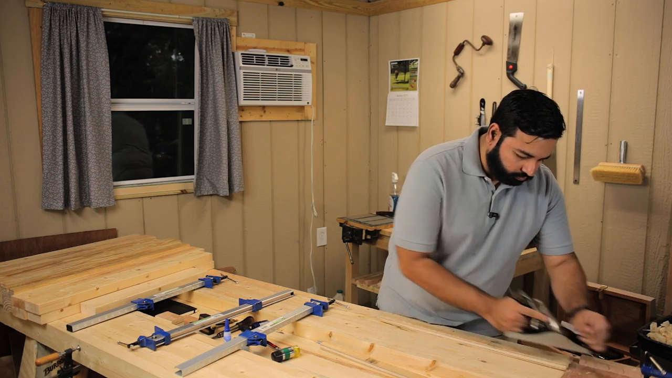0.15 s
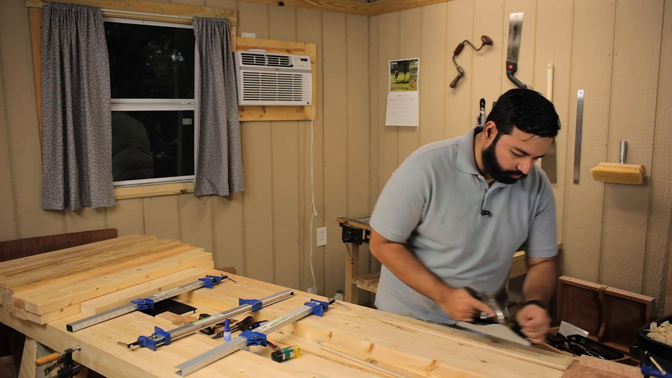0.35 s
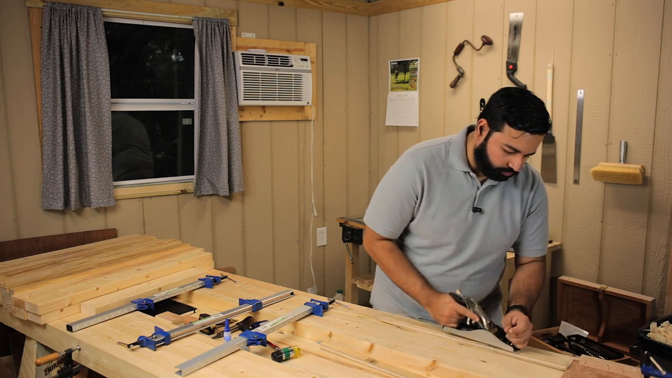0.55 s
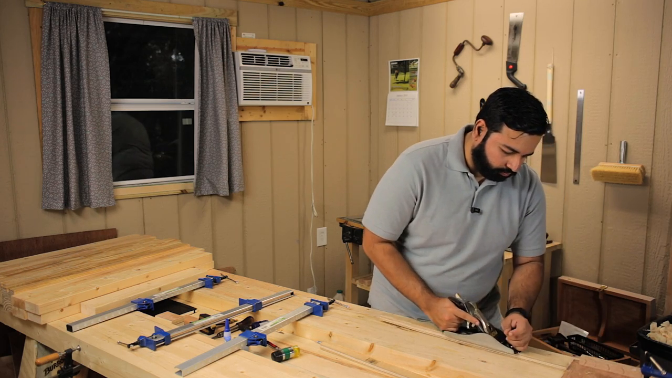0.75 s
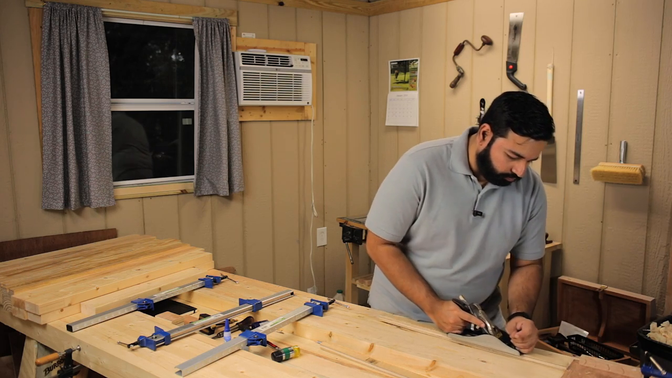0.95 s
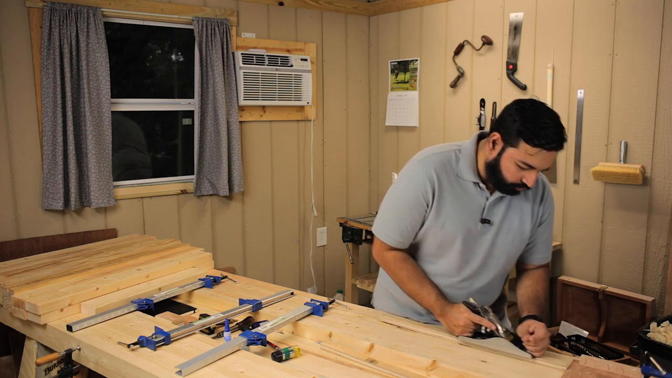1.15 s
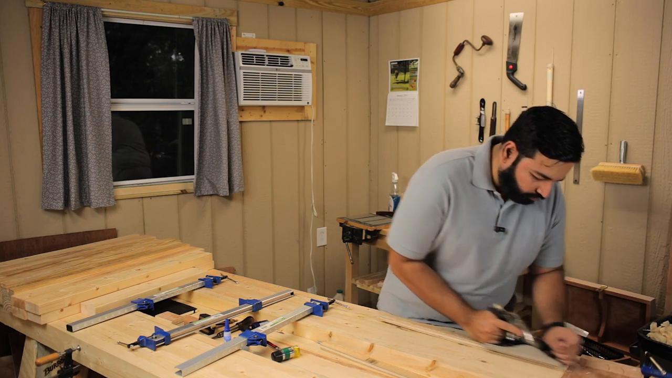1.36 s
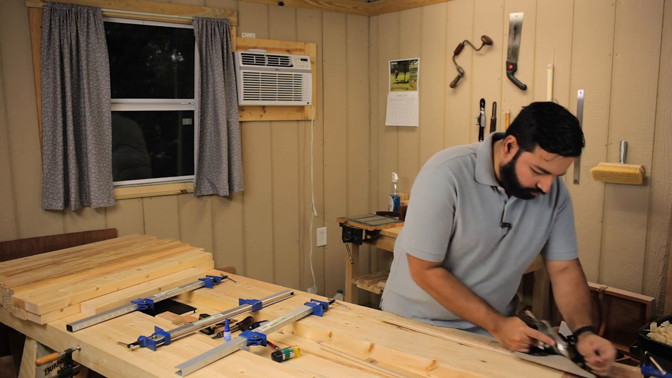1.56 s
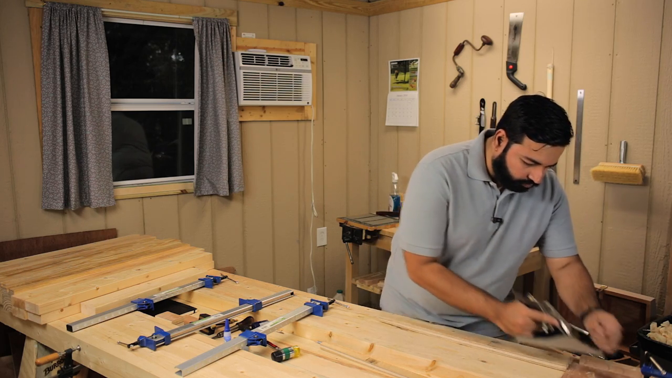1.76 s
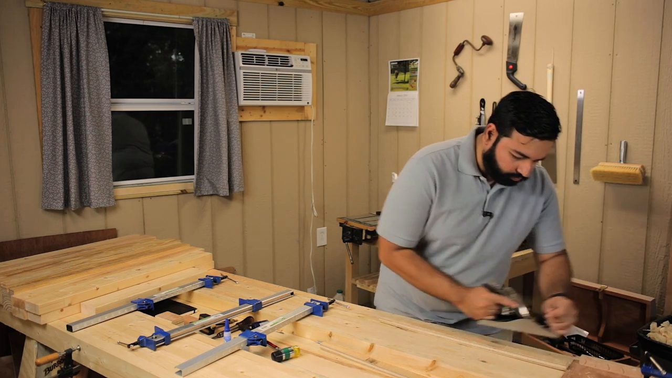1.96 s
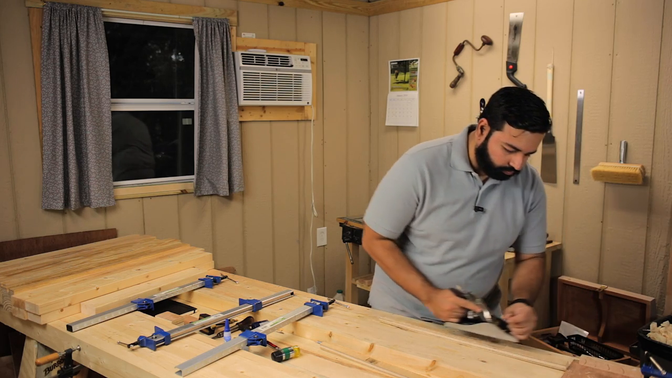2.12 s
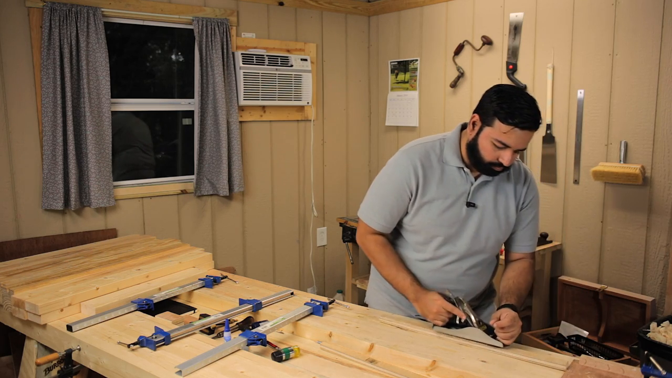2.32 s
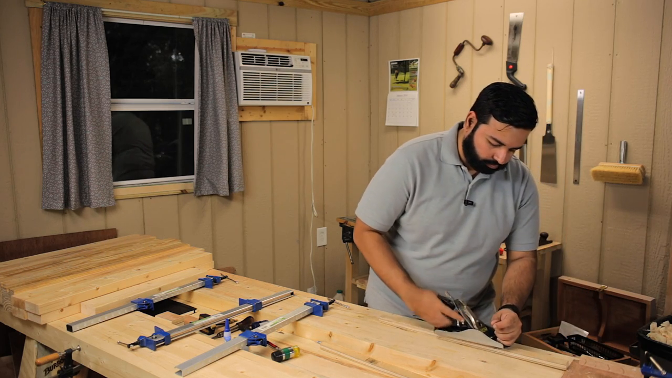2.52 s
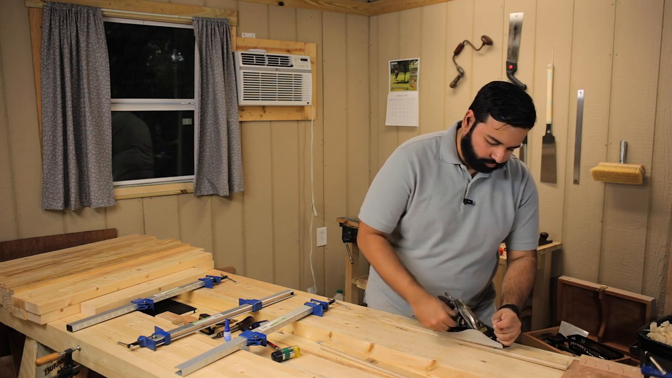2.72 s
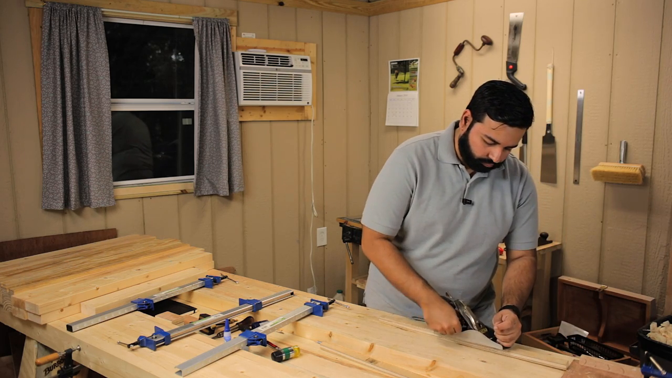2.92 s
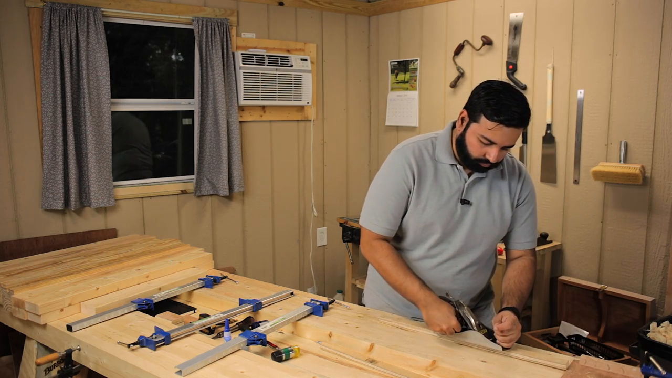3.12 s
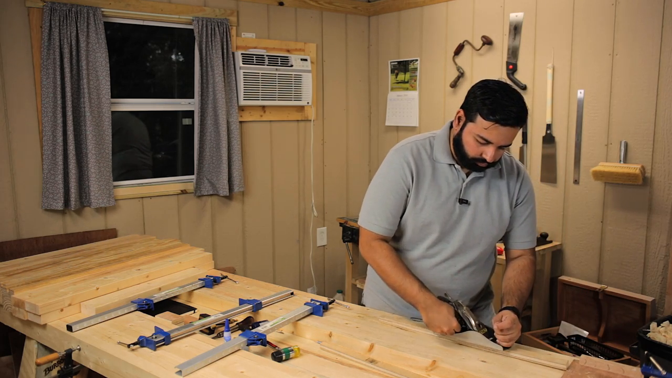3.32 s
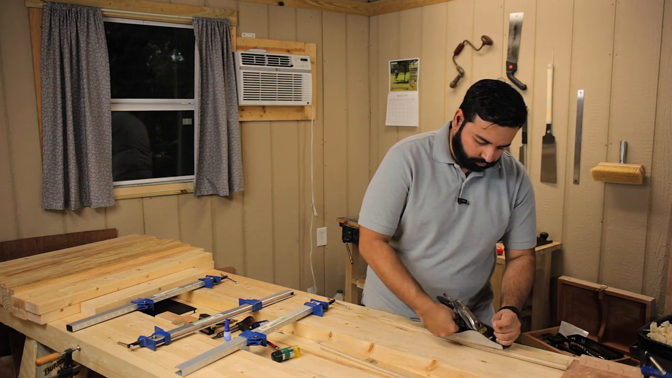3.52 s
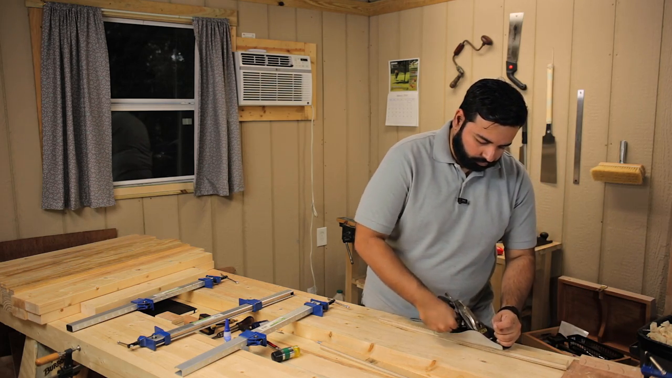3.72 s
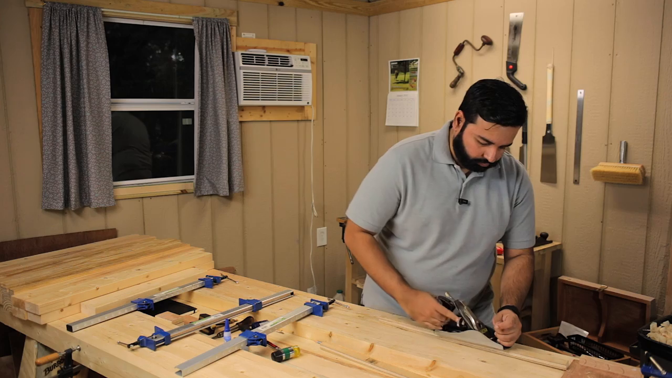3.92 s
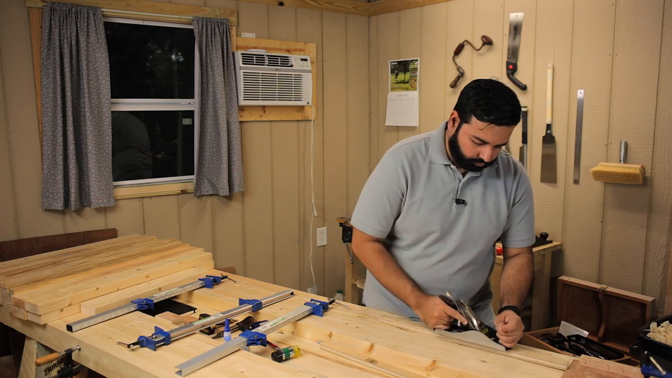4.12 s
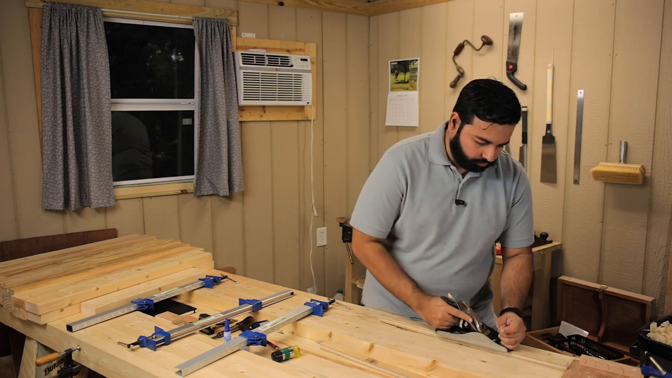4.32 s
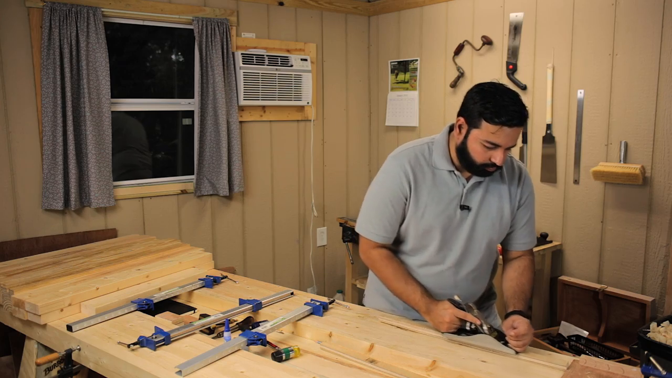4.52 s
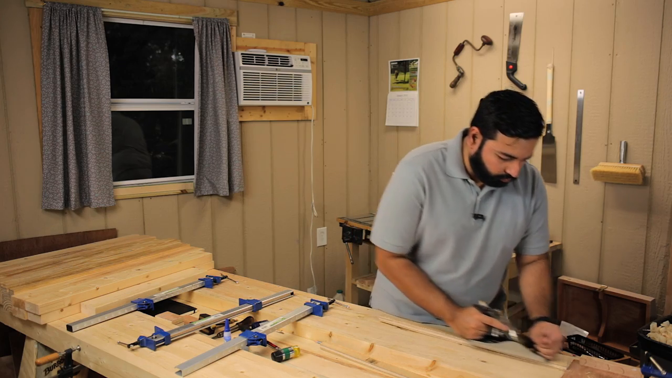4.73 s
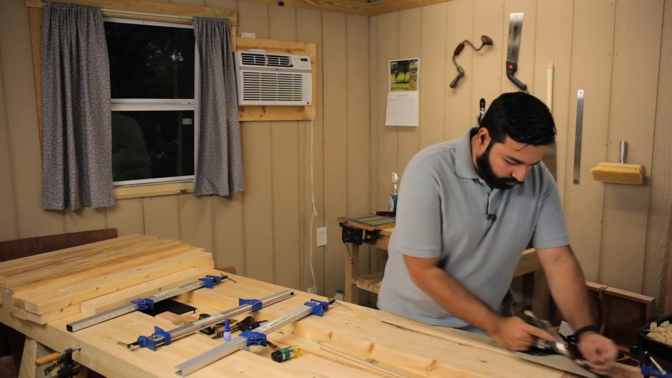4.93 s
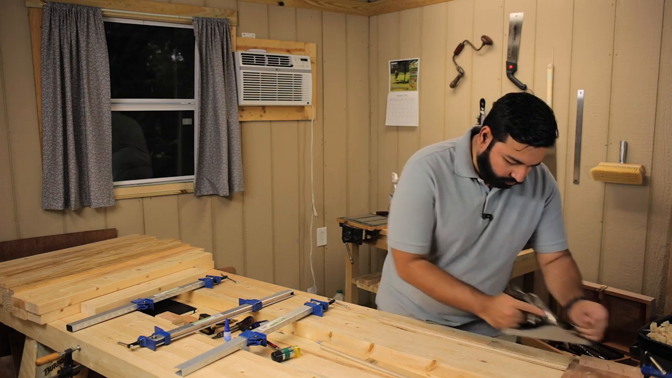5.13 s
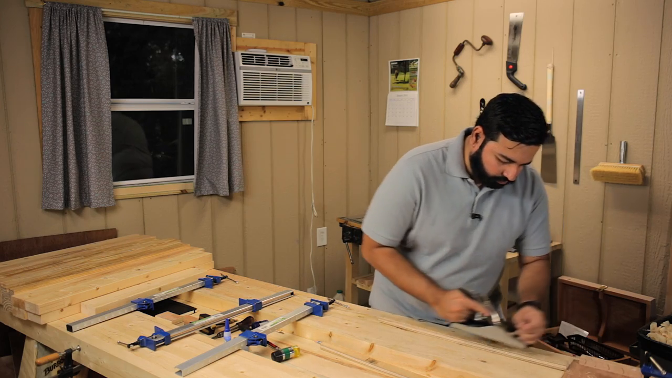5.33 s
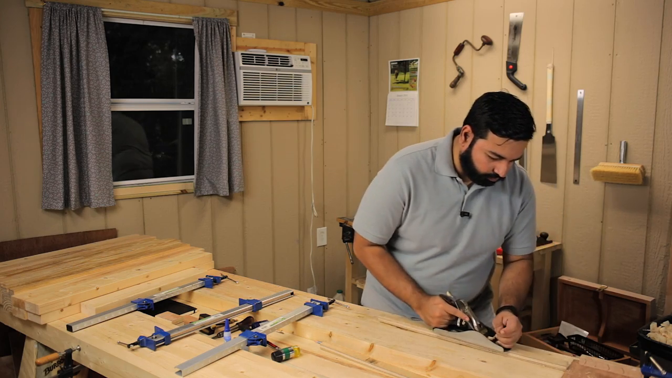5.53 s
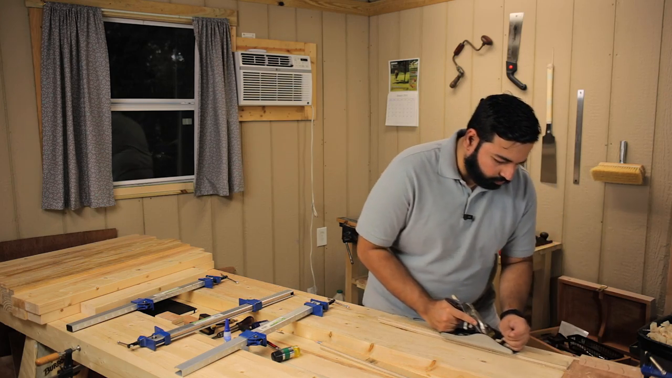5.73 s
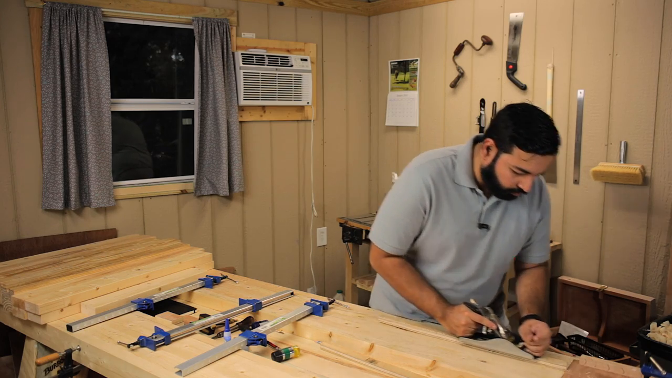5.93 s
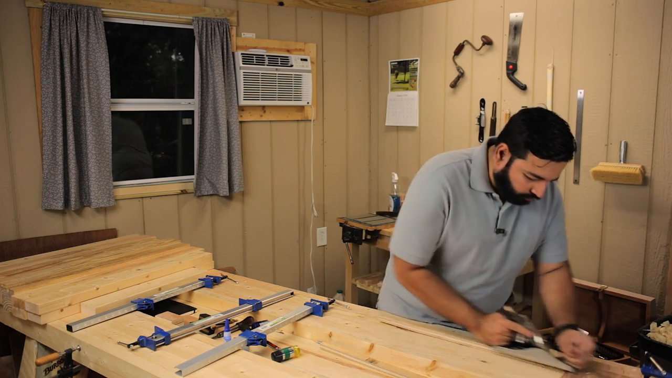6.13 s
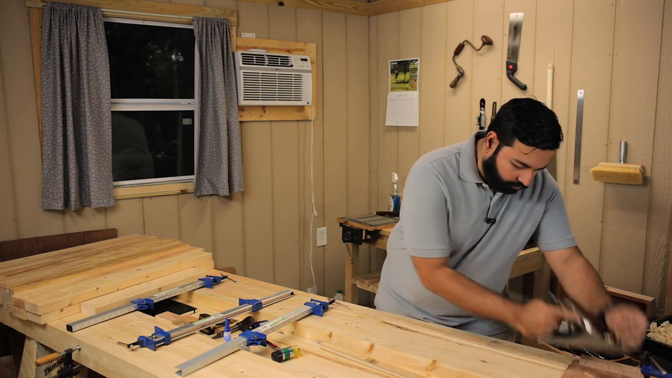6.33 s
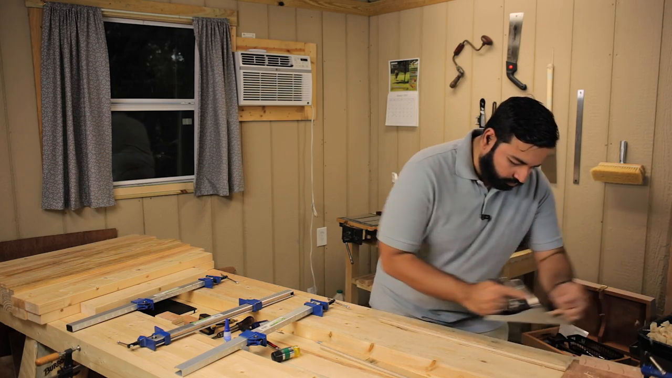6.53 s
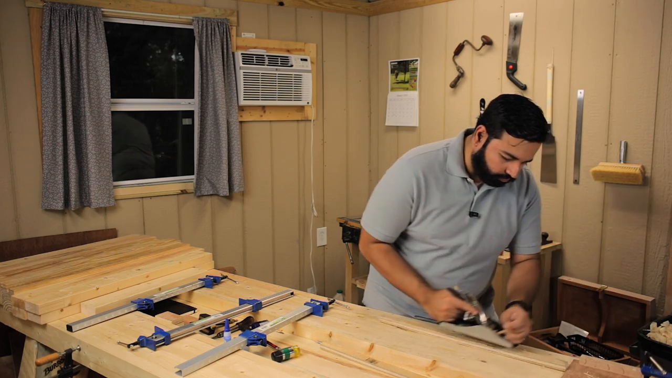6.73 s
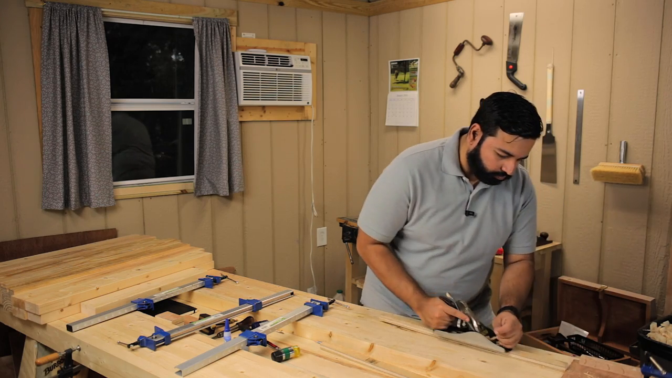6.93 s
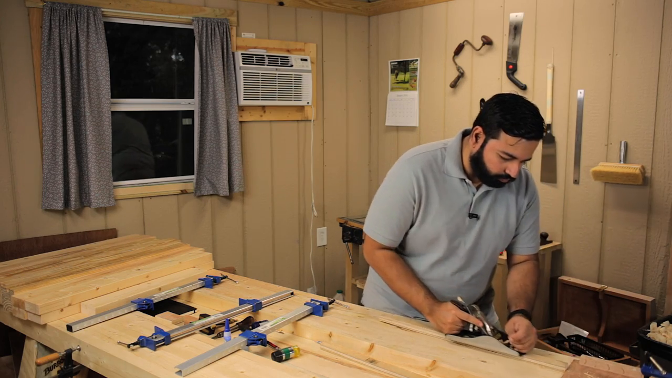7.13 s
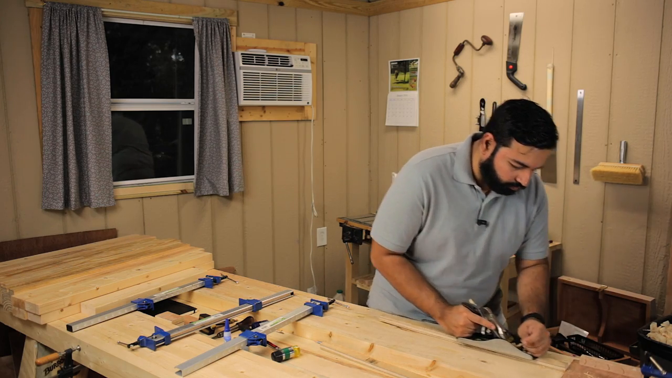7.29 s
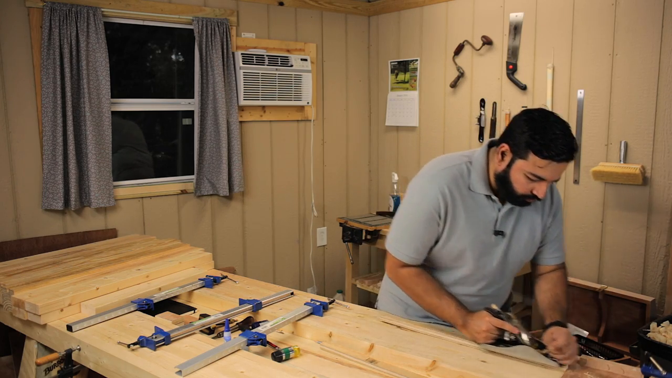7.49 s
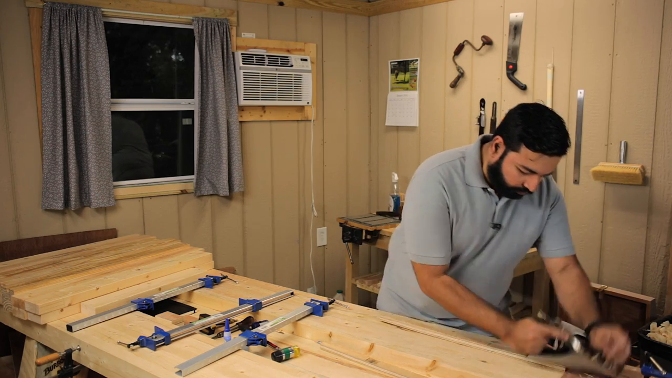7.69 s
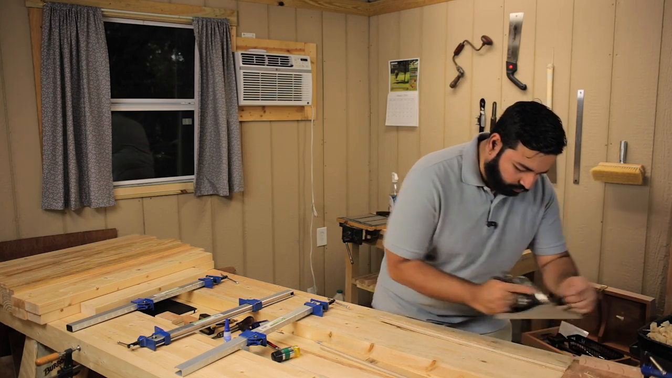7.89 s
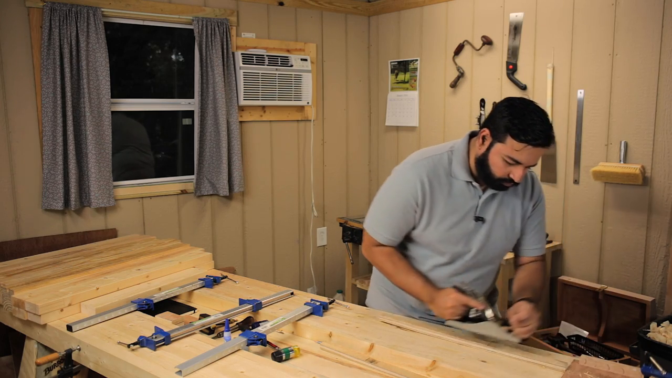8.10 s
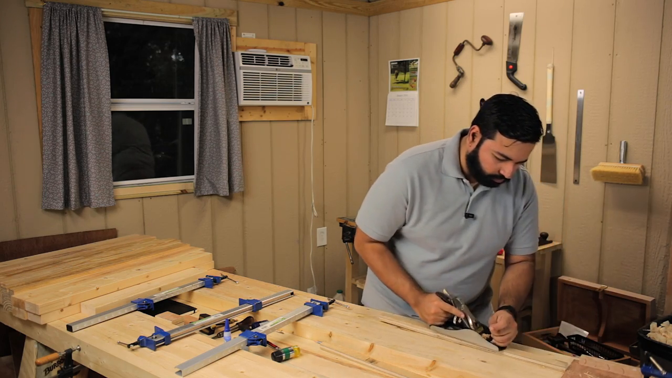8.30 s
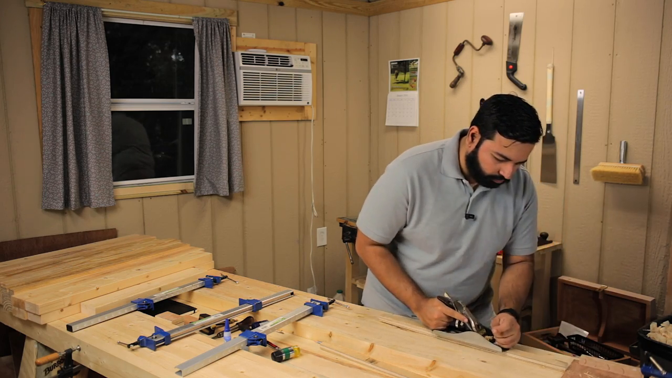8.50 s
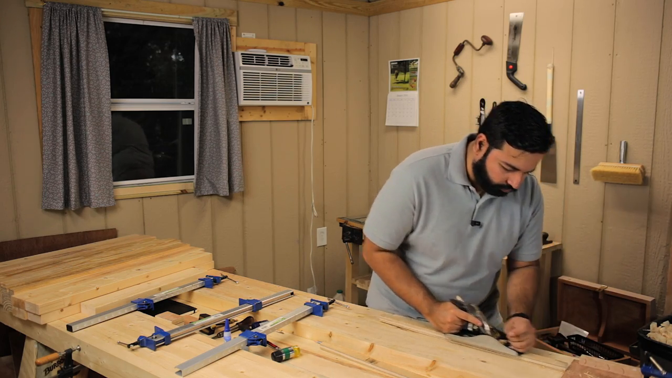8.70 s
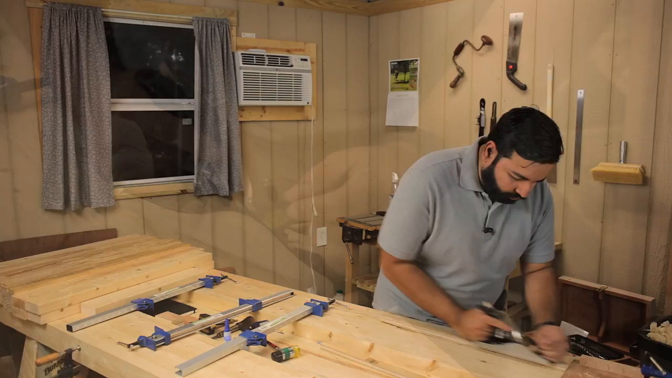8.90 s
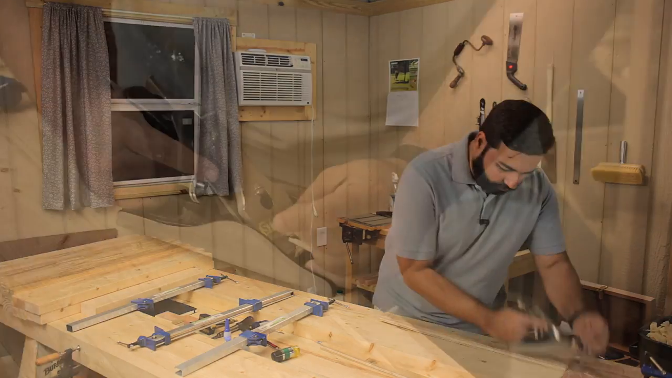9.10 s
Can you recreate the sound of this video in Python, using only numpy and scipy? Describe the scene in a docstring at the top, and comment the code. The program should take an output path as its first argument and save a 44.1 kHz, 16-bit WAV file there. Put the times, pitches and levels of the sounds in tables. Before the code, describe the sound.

In a small wooden workshop, a hand plane rasps once along a plywood strip. Its adjusting wheel scrapes and squeaks faintly, and a metal lever snaps shut. Four more bright, hissing strokes follow, with ticks of tool and chips and a few wooden knocks as the plane lands on the bench. A close stereo microphone picks up soft sleeve swishes, low bumps and quiet room air.

```python
"""In a small wooden shop, a hand plane is set on a plywood strip, slid into place and pushed five times.
Breaking fibres make a random friction force that drives the resonances of iron, sole and board.
Between strokes, impacts of the plane set the bench vibrating; once its depth wheel is turned, scraping
and squeaking, and its cap lever snaps shut. Tool and chips tick, and the room reverberates.
A close stereo microphone also picks up low bumps, soft swishes of sleeves and sole, and quiet room air."""
import sys
import numpy as np
from scipy import signal
from scipy.fft import rfft, irfft, next_fast_len
from scipy.io import wavfile
from scipy.ndimage import uniform_filter1d, map_coordinates

SR = 44100
rng = np.random.default_rng(int(sys.argv[2]) if len(sys.argv) > 2 else 0)


def log_audio(samples):
    """Write samples as a 16-bit WAV file to the path given in sys.argv[1]."""
    # one column per channel
    frames = np.atleast_2d(samples).T
    # limit to full scale, then quantise
    limited = np.clip(frames, -1, 1)
    pcm = np.round(limited * 32767).astype(np.int16)
    wavfile.write(sys.argv[1], SR, pcm)


N = 403515

# Noise spectra. Each row: frequency in Hz, relative spectral density in dB.
AIR_SPECTRUM = [(40, -11), (70, 3.5), (220, 0), (540, -7.5), (1100, -14), (2000, -15.5), (3900, -16),
                (5000, -22), (7500, -25.5), (12000, -23.5), (15000, -34), (16000, -39)]
SWISH_SPECTRUM = [(880, -16), (1500, -6.5), (2100, -8), (4070, 0.5), (4810, -4), (6930, -13.5), (9700, -7),
                  (14000, -11), (15900, -13.5)]
RUMBLE_SPECTRUM = [(8.8, -34.5), (15, 9.5), (26, 3), (42, -7), (100, -19.5), (134, -21.5), (220, -28),
                   (290, -58), (480, -120)]
# Coherence of the room air. Each row: frequency in Hz, left-right correlation.
AIR_CORRELATION = [(60, -0.67), (180, -0.46), (550, -0.28), (1650, 0.32), (4970, 0.43), (15000, -0.22)]
# Swells of noise. Each row: start, crest and end in seconds, level in dB.
SOFT_SWISHES = [(0.0, .18, 0.26, -50), (0.27, .32, 0.35, -59), (1.6, 1.72, 2, -48), (2.03, 2.1, 2.37, -55),
                (4.17, 4.24, 4.26, -57.5), (4.325, 4.345, 4.5, -48), (5.1, 5.2, 5.7, -56.5),
                (5.32, 5.58, 5.64, -51), (6.3, 6.4, 6.7, -49.5), (6.66, 6.82, 7.25, -49.5),
                (8.08, 8.3, 8.71, -52), (4.5, 4.7, 5.5, -50), (5.7, 5.9, 6.9, -48), (8.66, 8.84, 13, -52)]  # sleeves; in the last three rows, the sole hissing into a cut
MIC_SWAYS = [(-.1, 0, .45, -32.5), (.95, 1.1, 1.65, -38), (1.7, 1.8, 2.05, -36), (1.95, 2.13, 2.33, -42.5),
             (3.9, 4.15, 4.24, -42), (4.35, 4.5, 4.62, -38), (4.68, 4.8, 4.7, -30), (5.02, 5.13, 5.35, -35),
             (5.3, 5.6, 5.9, -36.5), (6.3, 6.52, 6.75, -39), (6.7, 6.87, 6.9, -36),
             (7.76, 7.89, 8.05, -22.5), (8.1, 8.28, 8.6, -38), (9.05, 9.15, 9.2, -33)]
# Jolts through the microphone. Each row: start in seconds, relative level in dB.
MIC_JOLTS = [(0.069, -36), (1.089, -33), (5.438, -40), (5.881, -29), (6.413, -13.5), (6.498, -26),
             (6.868, -36), (7.855, -17), (9.132, -20.5)]

# Reverberation time of the shop. Each row: frequency in Hz, T60 in seconds.
ROOM_T60 = [(100, 0.37), (400, 0.42), (1100, 0.49), (2500, 0.59), (5000, 0.45), (12000, 0.29)]
# Balances of the sound field. Each row: frequency in Hz, gain in dB.
REVERB_GAIN = [(100, -2), (400, -1.5), (1100, -8), (3000, -11), (8000, -5), (15000, -10)]
REVERB_SIDE_RE_MID = [(100, -4), (300, -8.5), (1000, -3.5), (3000, -12), (8000, 7), (15000, 4)]
DIRECT_LEFT_RE_RIGHT = [(60, 3), (180, -4), (550, 0.5), (1650, 1.5), (4970, 3), (15000, -3.5)]

# Resonances. Each row: frequency in Hz, bandwidth in Hz, relative level in dB.
IRON_MODES = [(2850, 164, -5), (3093, 108, 2.5), (3430, 164, 1.5), (3635, 88, 3), (3810, 124, -1.5),
              (4140, 185, -1), (4470, 170, -2), (5350, 270, -26.5)]  # cutting iron
FIZZ_MODES = [(5050, 430, 1), (6060, 520, -5.5), (6470, 140, 1.5), (7310, 520, -2), (8680, 300, -1),
              (10040, 210, 1), (10810, 330, 1.5), (11630, 390, 0.5), (13270, 710, -7.5),
              (15500, 1200, -21.5)]  # high modes of iron and cap
SOLE_MODES = [(1586, 770, -6), (2164, 365, 3), (2714, 130, -1)]  # cast sole
CASTING_MODES = [(2980, 39, -13), (3510, 45, 0.5), (4220, 54, -6.5), (4500, 140, -12.5), (5420, 130, -17.5)]  # upper modes of the plane body
SEAT_MODES = [(1880, 130, -12), (2200, 56, -1)]  # lower modes of the blade seat
BOARD_MODES = [(144, 31, -13), (255, 54, -8), (352, 56, -3), (582, 67, -3), (897, 45, -3.5),
               (985, 53, -5.5), (1263, 93, 1.5)]  # strip and bench top, rubbed
EDGE_MODES = [(4050, 297, 7.5), (4360, 340, 1.5), (5290, 730, -10.5), (6100, 600, -13.5)]  # bright ring near the strip's end
FREE_STRIP_MODES = [(320, 54, -6), (613, 215, -6), (982, 86, 5), (1265, 150, 0)]  # strip without load
PINCHED_STRIP_MODES = [(1280, 480, 2.5), (1600, 540, 3.5), (1970, 430, 2)]  # strip under the sole
BENCH_MODES = [(98, 49, -6.5), (156.5, 26, 0), (225, 40, -5), (297, 50, -2.5), (400, 68, -4),
               (586, 154, -5), (739, 110, -5), (971, 87, -8.5), (1225, 72, -4.5), (1580, 310, -11)]  # bench top, struck
# Steel modes of the cap lever. Each row: frequency in Hz, relative level in dB, T60 in seconds.
LEVER_MODES = [(700, -15, .03), (974, -13, .03), (1290, -6, .035), (1920, -1, .03), (2150, -4, .03),
               (2690, -5, .022), (3050, -7, .02), (3520, -5, .03), (4150, -10, .018), (6900, -27, .012)]

# Ticks of tool and chips. Each row: start in seconds, drive level in dB, centre frequency in Hz.
CHIP_TICKS = [(0.2, -32, 3940), (0.3, -38.5, 3030), (0.325, -37, 4240), (0.478, -43, 3300),
              (0.8094, -39.5, 4040), (0.932, -33.5, 3400), (1.142, -24.5, 3460), (1.1505, -16.5, 3420),
              (1.278, -30, 3990), (1.9424, -37, 3830), (3.1373, -39, 3080), (4.3417, -27.5, 4000),
              (4.423, -39.5, 3270), (4.442, -32.5, 4100), (4.468, -29, 3400), (4.7475, -10, 3780),
              (4.775, -16, 3400), (5.75, -32, 2170), (5.9638, -6, 3380), (7.119, -29, 4310),
              (8.5902, -32, 4050), (8.659, -28, 2170), (8.679, -24, 3580), (8.693, -15, 2220),
              (8.72, -43, 2770)]
# Turns of the depth wheel. Each row: start and length in seconds, relative level in dB.
WHEEL_TURNS = [(2.892, 0.028, -54), (2.97, 0.051, -58), (3.08, 0.022, -61), (3.202, 0.062, -48),
               (3.256, 0.037, -45), (3.32, 0.021, -60), (3.377, 0.081, -46), (3.476, 0.059, -42),
               (3.564, 0.062, -38.5), (3.64, 0.04, -46.5), (3.698, 0.03, -52), (3.805, 0.064, -49),
               (3.888, 0.018, -47)]
# Squeaks of its dry thread. Each row: start and length in seconds, frequency in Hz, level in dB.
THREAD_SQUEAKS = [(2.903, 0.123, 1597, -57), (3.138, 0.028, 2176, -58)]
# Closing of the cap lever. Each row: start in seconds, peak level in dB.
LEVER_SNAPS = [(3.977, -6)]
# Impacts of plane on wood. Each row: start in seconds, tock level in dB, thud and click in dB re tock.
PLANE_KNOCKS = [(1.151, -33.5, -11.5, 15), (2.34, -49, -10, -14), (2.528, -20, -8, -4), (3.809, -44, 7, -8),
                (4.486, -35, -2.5, 0), (5.608, -19, -6.5, -14), (5.758, -39.5, 4, -9),
                (6.407, -5.5, -11, -22), (6.971, -14, -7.5, -10), (8.591, -42, 8, 5)]
# Faint rubbing of the sole; the first row is a stroke dying away. Each row: start and end in seconds,
# level at start and at end in dB, board level in dB re rub.
FAINT_RUBS = [(0.0, 0.1, -45, -61, -3.5), (0.95, 1.167, -57, -41, -7.5), (1.169, 1.359, -44, -37, -1.5),
              (2.43, 2.526, -63, -56.5, -17), (2.62, 2.717, -60.5, -57.5, -12),
              (4.5, 4.745, -54.5, -41.5, -9), (5.72, 5.964, -53, -40, -10), (7.05, 7.302, -53, -45, -6),
              (8.6, 8.882, -60, -38, -9)]
# The blade cutting, one curve a stroke. Each row: time in seconds, bite in dB, sole in dB re bite.
CUT_CURVES = [
    [(1.36, -36.5, -4), (1.468, -16.5, -6.5), (1.5, -15.5, -7), (1.532, -19.5, -9.5), (1.564, -16, -9),
     (1.59, -18.5, -3.5), (1.64, -30.5, -8)],
    [(4.745, -31.5, -5), (4.801, -18, -6.5), (4.867, -16.5, 0.5), (4.953, -16, -4.5), (5.039, -18, -4.5),
     (5.06, -36, -6)],
    [(5.962, -30.5, 3), (5.982, -18, -5.5), (6.048, -23, -5), (6.158, -16, -1), (6.268, -17, -8.5),
     (6.324, -13, -17), (6.335, -28, -8)],
    [(7.3, -48.5, 4), (7.354, -35, -1), (7.508, -25.5, 0.5), (7.628, -18, -1), (7.672, -19, -1),
     (7.716, -15, -7.5), (7.768, -18, -11), (7.78, -30.5, -8)],
    [(8.882, -15.5, -6), (8.89, -19.5, -8), (8.944, -23.5, -5.5), (9.01, -15.5, -3), (9.086, -19, -4.5),
     (9.15, -29, 7.5)],
]
# Response to each stroke. Each row: board and fizz in dB re a firm bite, run-out hum level in dB.
STROKE_RESPONSES = [(-12.5, -15.5, -29.5), (-12.5, -15, -25.5), (-8, -10.5, -28), (-8.5, -10, -29.5),
                    (-8.5, -10, -40)]


def amp(db):
    """Amplitude ratio of a level in dB."""
    return 10 ** (np.asarray(db) / 20)


def unit_rms(x):
    """Normalisation to an rms of 1."""
    return x / np.sqrt(np.mean(x ** 2) + 1e-20)


def unit_peak(x):
    """Normalisation to a peak of 1."""
    return x / np.abs(x).max()


def along(points, hz):
    """Interpolation of (Hz, value) points on a logarithmic frequency axis."""
    freqs, values = np.transpose(points)
    return np.interp(np.log(hz + 1), np.log(freqs + 1), values)


def wobble(rate):
    """Smooth random modulation: a spline through `rate` knots a second."""
    return map_coordinates(rng.standard_normal(int(N * rate / SR) + 4), [np.arange(N) * rate / SR])


def add(track, start, sound):
    """Superposition of a sound on a track, from `start` seconds."""
    part = track[round(start * SR):][:len(sound)]
    part += sound[:len(part)]


def filtered(x, response):
    """Linear filtering: the spectrum is multiplied by a frequency response."""
    size = next_fast_len(x.shape[-1] + SR // 4)
    return irfft(rfft(x, size) * response(np.fft.rfftfreq(size, 1 / SR)), size)[..., :x.shape[-1]]


def resonate(force, modes):
    """Modal superposition: a force drives damped resonators, summed with alternating sign."""
    return filtered(force, lambda hz: sum(
        (-1) ** k * amp(db) * 1j * hz * width / (centre ** 2 - hz ** 2 + 1j * hz * width)
        for k, (centre, width, db) in enumerate(modes)))


def lowpass(x, corner_hz, order):
    """Roll-off above a corner, 6 dB an octave for each order."""
    return filtered(x, lambda hz: 1 / (1 + 1j * hz / corner_hz) ** order)


def swells(rows):
    """Amplitude envelope with one smooth rise and fall a row."""
    t = np.arange(N) / SR
    ramps = [(db, np.interp(t, [start, crest, end], [0, 1, 0])) for start, crest, end, db in rows]
    return sum(amp(db) * ramp * ramp * (3 - 2 * ramp) for db, ramp in ramps)


def envelopes(curves):
    """Amplitude envelopes, one for each dB column after the time; silent outside the curves."""
    t, total = np.arange(N) / SR, 0
    for rows in curves:
        times, *columns = np.transpose(rows)
        total = total + amp([np.interp(t, times, db, -200, -200) for db in columns])
    return uniform_filter1d(total, size=90, axis=1)


def stereo_noise(spectrum, correlation):
    """Partial coherence: the ratio of independent mid and side noise sets the correlation."""
    def response(hz):
        angle = np.arccos(np.clip(along(correlation, hz), -1, 1)) / 2
        return amp(along(spectrum, hz)) * [np.cos(angle), np.sin(angle)]
    mid, side = filtered(rng.standard_normal((2, N)), response)
    return unit_rms(np.array([mid + side, mid - side]))


def room_air(level_db=-52):
    """Ambient noise: a partly coherent field whose level wavers slightly."""
    return amp(level_db + 0.88 * wobble(9.7)) * stereo_noise(AIR_SPECTRUM, AIR_CORRELATION)


def swishes():
    """Friction noise: soft high swishes of sleeves and the hiss of the sole sliding into a cut."""
    gain = swells(SOFT_SWISHES) * amp(wobble(19))
    return gain * stereo_noise(SWISH_SPECTRUM, correlation=[(2000, 1.0), (12000, 0.45)])


def microphone_sway(rest_db=-45.5):
    """Handling noise: body movement sways the microphone, giving bass largely in antiphase."""
    lumps = amp(3.9 * wobble(20))
    motion = swells(MIC_SWAYS) + amp(rest_db + 2 * wobble(2.2))
    return lumps * motion * stereo_noise(RUMBLE_SPECTRUM, correlation=[(30, -0.93), (150, -0.66)])


def microphone_jolts(swing_hz=45):
    """Heavily damped oscillation: one slow swing a jolt, in antiphase and stronger on the left."""
    out, cycles = np.zeros(N), np.arange(SR // 8) / SR * swing_hz
    for start, db in MIC_JOLTS:
        add(out, start, amp(db + 19) * np.sin(2 * np.pi * cycles) * cycles * np.exp(-2.5 * cycles))
    return out * [[1.6], [-.9]]


def room_tail(length):
    """Absorption: mid and side noise decay exponentially, each frequency with its own T60."""
    hz, t, spectra = signal.stft(rng.standard_normal((2, length)), SR, nperseg=128)
    decay = amp(-60 * t / along(ROOM_T60, hz)[:, None])
    tail = signal.istft(spectra * decay, SR, nperseg=128)[1][:, :length]
    return tail / np.linalg.norm(tail[0])


def reverberation(x, delay_samples=200):
    """Diffuse field: each half second of sound is convolved with a new random room tail."""
    out, hop = np.zeros((2, N + 2 * SR)), SR // 2
    for start in range(0, N, hop):
        wet = signal.fftconvolve(x[None, start:start + hop], room_tail(SR * 3 // 5), axes=1)
        arrival = start + delay_samples
        out[:, arrival:arrival + wet.shape[1]] += wet
    balance = lambda hz: amp(along(REVERB_GAIN, hz) + along(REVERB_SIDE_RE_MID, hz) * [[0], [1]])
    mid, side = filtered(out[:, :N], balance)
    return np.array([mid + side, mid - side]) / np.sqrt(2)


def ticks(t60_s=0.048):
    """Transient excitation: each small click drives one broad resonance and, weakly, the iron."""
    out, t = np.zeros(N), np.arange(SR // 12) / SR
    for start, db, hz in CHIP_TICKS:
        burst = np.minimum(t / 0.0018, 1) * amp(db - 60 * t / t60_s) * rng.standard_normal(len(t))
        add(out, start, resonate(burst, [(hz, 0.29 * hz, 0)]) + 0.42 * resonate(burst, IRON_MODES))
    return out


def depth_wheel(seat_db=-12):
    """Thread friction: scraping rings casting and blade seat; twice, stick-slip sings a note."""
    out = np.zeros(N)
    for start, length, db in WHEEL_TURNS:
        n = round(length * SR)
        scrape = rng.standard_normal(n) * amp(2.9 * rng.standard_normal(n))
        force = np.pad(scrape * signal.windows.tukey(n, .7), (0, SR // 20))
        ring = resonate(force, CASTING_MODES) + amp(seat_db) * resonate(force, SEAT_MODES)
        add(out, start, amp(db + 17.5) * ring)
    for start, length, hz, db in THREAD_SQUEAKS:
        t = np.arange(round(length * SR)) / SR
        drift = np.cumsum(.012 * rng.standard_normal(len(t)))  # the slip cycle is not quite steady
        add(out, start, amp(db) * signal.windows.tukey(len(t), .3) * np.sin(2 * np.pi * hz * t + drift))
    return out


def cap_lever():
    """Free vibration: the lever snaps onto the iron, and damped steel modes ring over a dull crack."""
    out, t = np.zeros(N), np.arange(SR // 4) / SR
    crack_hz_db = [(500, -25.5), (1200, 4.5), (4200, 2), (5200, -30),
                   (7000, -19), (9000, -25), (16000, -54)]
    attack = np.sin(np.pi / 2 * np.minimum(t / 0.0015, 1)) ** 2
    for start, db in LEVER_SNAPS:
        ring = sum(amp(level - 60 * t / t60) * np.sin(2 * np.pi * (hz * t + rng.random()))
                   for hz, level, t60 in LEVER_MODES)
        burst = amp(-60 * t / 0.057) * rng.standard_normal(len(t))
        crack = filtered(burst, lambda hz: amp(along(crack_hz_db, hz)))
        add(out, start, amp(db) * unit_peak((ring + 0.94 * crack) * attack))
    return out


def knocks(heel_delay_s=0.004):
    """Impact excitation: toe and heel land with a hard tock, then the bench modes swell and decay."""
    out, t = np.zeros(N), np.arange(SR // 3) / SR
    toe = amp(-60 * t / 0.014)
    heel = 0.31 * (t > heel_delay_s) * amp(-60 * (t - heel_delay_s) / 0.047)
    for start, db, thud_db, click_db in PLANE_KNOCKS:
        contact = rng.standard_normal(len(t)) * (toe + heel) * np.minimum(t / 0.00071, 1)
        settling = rng.standard_normal(len(t)) * amp(-60 * t / 0.4) * np.minimum(t / 0.007, 1)
        tock = unit_peak(resonate(contact, PINCHED_STRIP_MODES))
        click = amp(click_db) * unit_peak(resonate(contact, IRON_MODES))
        blow = lowpass(tock + click, 4500, order=2)  # wood on iron carries little treble
        reach_hz = 3000 * amp((db + 7) * 0.7)  # a gentle blow stirs only the lowest bench modes
        thud = lowpass(resonate(settling, BENCH_MODES), reach_hz, order=2)
        add(out, start, amp(db) * (blow + amp(thud_db) * unit_peak(thud)))
    return out


def runout_hum(fade_db_per_s=112.5):
    """Free decay: relieved of the plane's weight as a cut ends, the strip hums a few hollow notes."""
    t, gain = np.arange(N) / SR, 0
    for curve, (_, _, hum_db) in zip(CUT_CURVES, STROKE_RESPONSES):
        end = curve[-1][0]
        gain = gain + (t > end) * amp(hum_db - fade_db_per_s * np.abs(t - end))
    return gain * unit_rms(resonate(rng.standard_normal(N), FREE_STRIP_MODES))


def rub_gains(fizz_db=-9.5, sole_db=-2.5):
    """Light friction: slightly uneven gains of iron, board, fizz and sole as the sole rubs faintly."""
    curves = [[(time, db, db + board_db, db + fizz_db, db + sole_db)
               for time, db in [(start, start_db), (end, end_db)]]
              for start, end, start_db, end_db, board_db in FAINT_RUBS]
    return envelopes(curves) * amp(wobble(16))


def cut_gains(firm_db=-18, board_db_per_db=0.47, edge_end_db=-3, edge_rise_db_per_s=57):
    """Cutting load: iron, board, fizz, sole and edge follow the bite; the edge grows along the cut."""
    curves = []
    for curve, (board_db, fizz_db, _) in zip(CUT_CURVES, STROKE_RESPONSES):
        times, bite, sole_db = np.transpose(curve)
        board = firm_db + board_db + board_db_per_db * (bite - firm_db)
        edge = bite + edge_end_db - edge_rise_db_per_s * (times[-1] - times)
        curves.append(np.column_stack([times, bite, board, bite + fizz_db, bite + sole_db, edge]))
    return envelopes(curves)


def fibre_force(breaks_per_s=14000, spread_db=1.5, flutter_db=0.19):
    """Shot noise: fibres break at random times and in uneven sizes that vary with the grain."""
    breaks = (rng.random(N) < breaks_per_s / SR) * rng.standard_normal(N)
    sizes = amp(spread_db * rng.exponential(size=N))
    flutter = amp(flutter_db * (wobble(30) + wobble(150)))
    return unit_rms(breaks * sizes * flutter)


def wood_grain(x, depth_db=1.6):
    """Spectral modulation: changing grain lifts and sinks patches of about 350 Hz by 50 ms."""
    spectra = signal.stft(x, nperseg=512)[2]
    bands = uniform_filter1d(rng.standard_normal(spectra.shape), size=4, axis=0)
    patches = uniform_filter1d(bands, size=9, axis=1)
    return signal.istft(spectra * amp(depth_db * unit_rms(patches)), nperseg=512)[1][:N]


def planing():
    """Forced vibration: one friction force drives iron, sole and board; added hiss feeds the fizz."""
    force = fibre_force()
    iron, board, fizz, sole, edge = cut_gains()
    rub_iron, rub_board, rub_fizz, rub_sole = rub_gains()
    hiss = force + 1.27 * rng.standard_normal(N)
    dull_force = lowpass(force, 700, order=1)  # a light rub stirs mostly the lowest board modes
    paths = [(iron + rub_iron, force, IRON_MODES), (sole + rub_sole, force, SOLE_MODES),
             (board, force, BOARD_MODES), (rub_board, dull_force, BOARD_MODES),
             (edge, force, EDGE_MODES), (fizz + rub_fizz, hiss, FIZZ_MODES)]
    return wood_grain(sum(gain * amp(1.2 * wobble(30)) * unit_rms(resonate(drive, modes))
                          for gain, drive, modes in paths))


def scene():
    """Superposition of the direct sound of the work, its reverberant field and the background."""
    work = planing() + runout_hum() + depth_wheel() + knocks() + cap_lever() + ticks()
    direct = filtered(work, lambda hz: amp(along(DIRECT_LEFT_RE_RIGHT, hz) * [[.5], [-.5]]))
    return direct + reverberation(work) + room_air() + swishes() + microphone_sway() + microphone_jolts()


def record(dry, ceiling=0.95, top_hz=15800):
    """Soft saturation and band limiting: the input stage rounds peaks and removes the highest treble."""
    rounded = dry / (1 + np.abs(dry / ceiling) ** 6) ** (1 / 6)
    return filtered(rounded, lambda hz: hz < top_hz)


dry = scene()
out = record(dry)
log_audio(out)
```